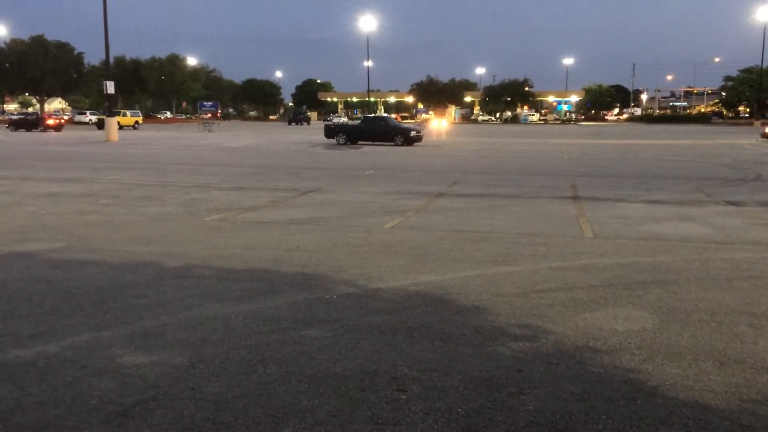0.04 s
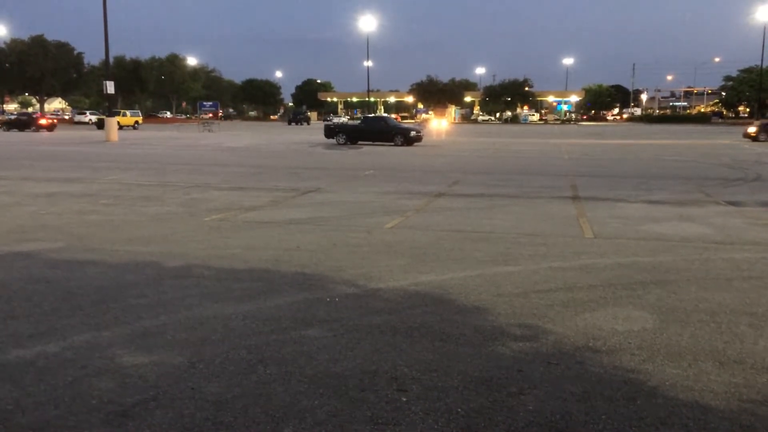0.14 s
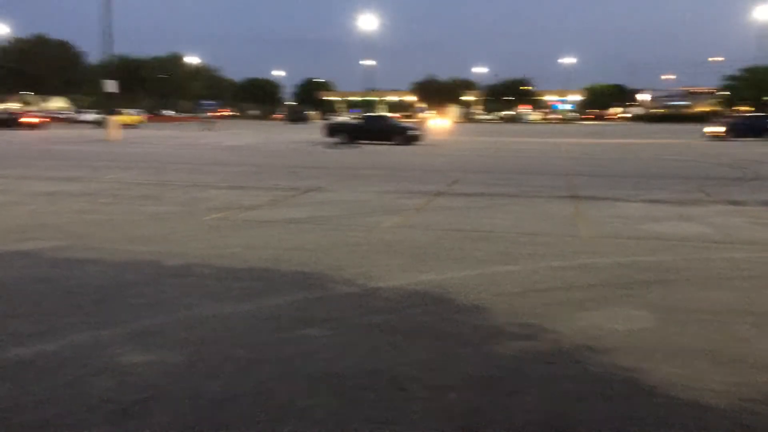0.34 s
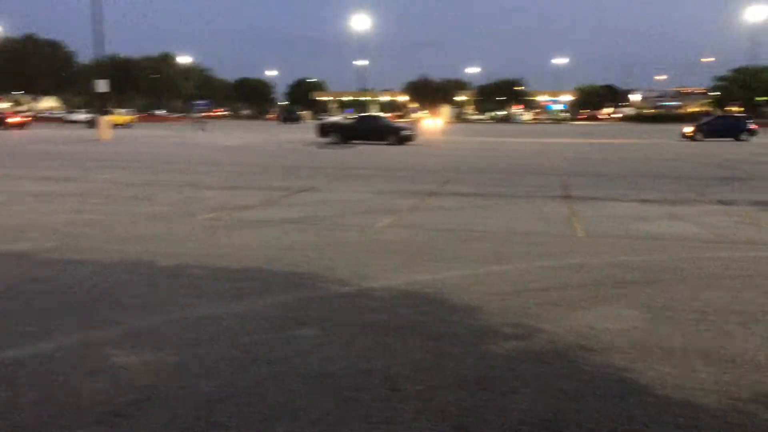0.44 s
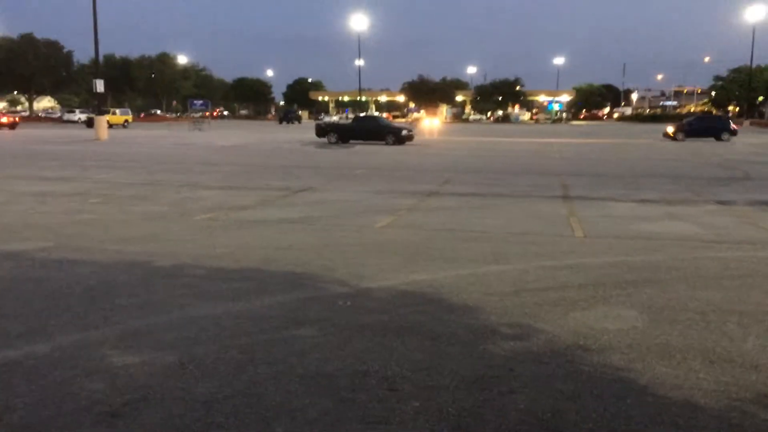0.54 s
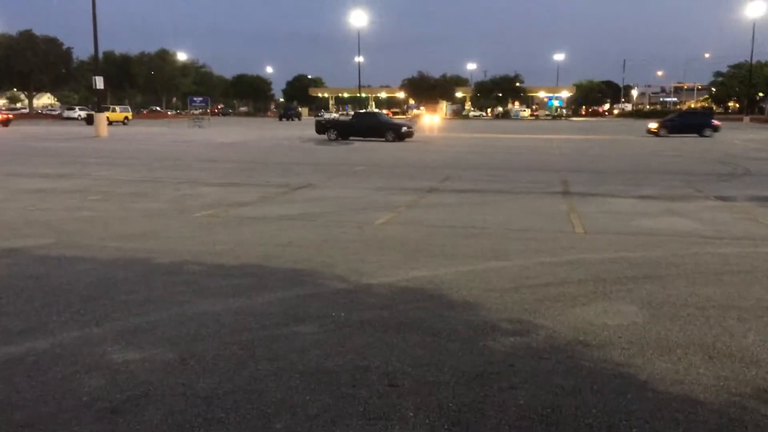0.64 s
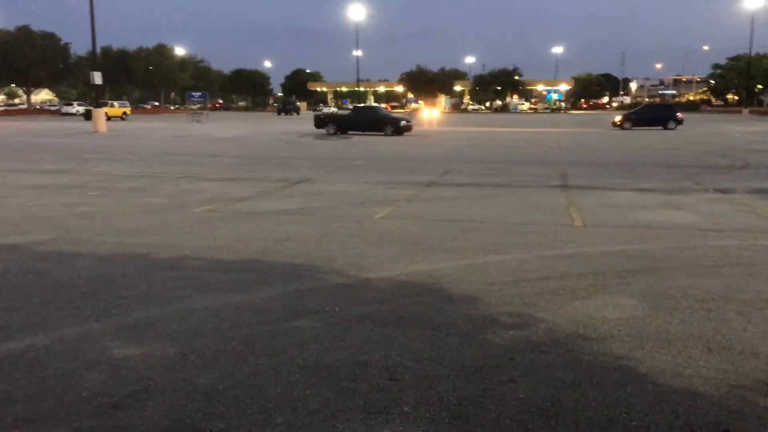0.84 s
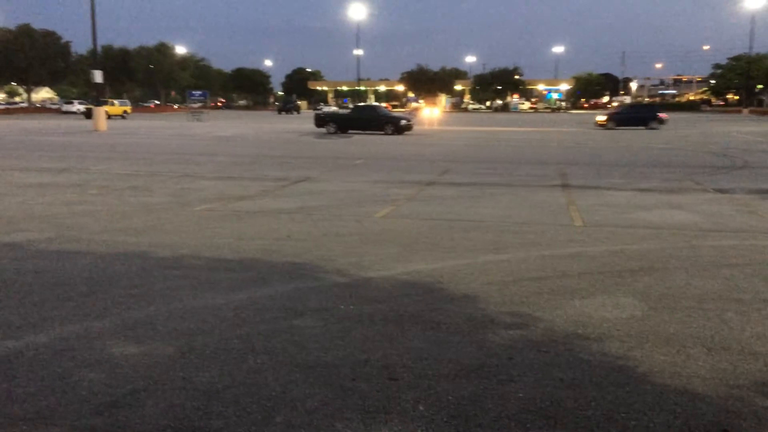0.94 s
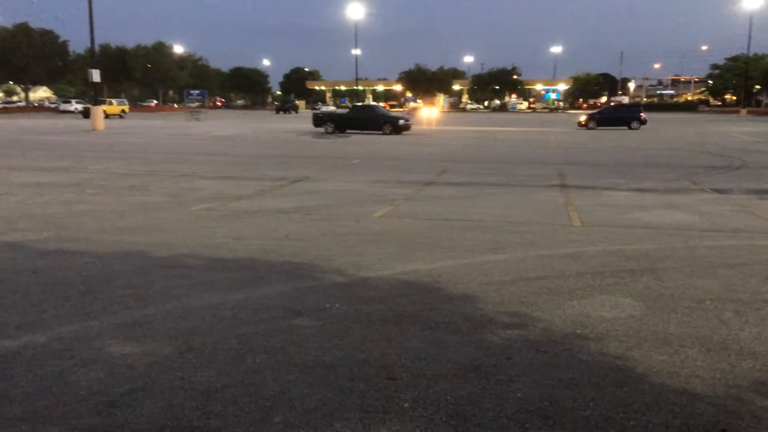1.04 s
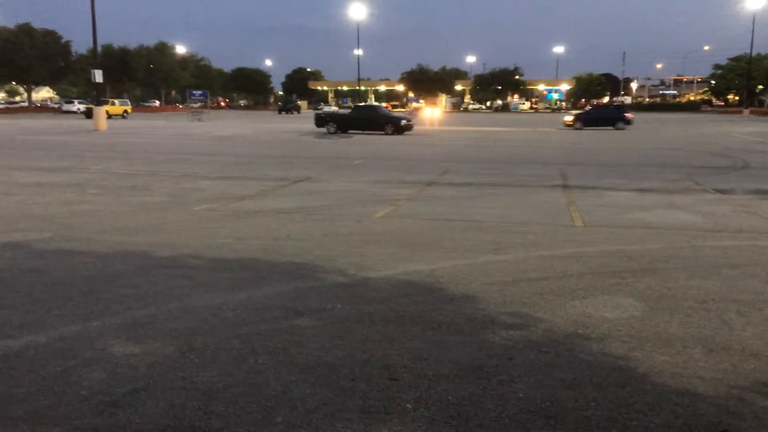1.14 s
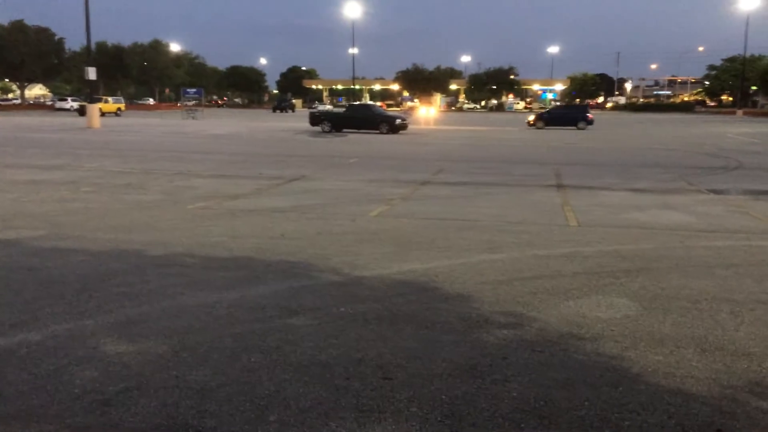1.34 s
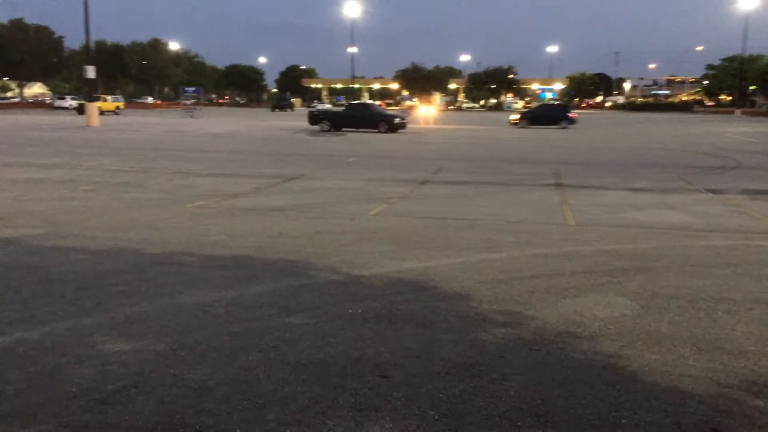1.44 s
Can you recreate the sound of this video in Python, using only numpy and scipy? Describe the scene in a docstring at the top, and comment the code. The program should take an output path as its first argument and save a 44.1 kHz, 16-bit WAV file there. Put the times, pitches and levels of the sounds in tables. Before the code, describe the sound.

Outdoors in a parking lot, over a faint hum of far traffic, a loud three-tone air horn blasts once. The brassy chord holds steady with a rush of air, then stops and briefly rings out.

```python
"""An open parking lot, across which a three-chime train horn gives one blast of about a second.
Each diaphragm buzzes into its bell with a harmonic series, and sum tones join the chord. The horns start
sharp and settle as air pressure builds, dull as the tank drains, and ring out when the valve shuts.
Air rushes through the bells; just before the end the chord falters with a dull puff and swells.
Cars and pavement scatter the sound, distant buildings send it back, and traffic hums behind it."""
import sys
import numpy as np
from scipy import signal
from scipy.fft import rfft, irfft
from scipy.io import wavfile

SR = 44100
rng = np.random.default_rng(int(sys.argv[2]) if len(sys.argv) > 2 else 0)


def dump_mix(stems):
    """Bounce the given channels to the path in sys.argv[1] as a 16-bit WAV at rate SR."""
    frames = np.atleast_2d(stems).T  # one column per channel
    limited = np.clip(frames, -1, 1)  # hard clip at full scale
    pcm = np.round(limited * 32767).astype(np.int16)
    wavfile.write(sys.argv[1], SR, pcm)


N = 66150
T = np.arange(N) / SR
OPEN_S, SHUT_S = 0.233, 1.1912  # the air valve
DULL_HZ, EDGE_HZ = 2520, 15350  # corner of the treble loss; upper band limit


def horns():
    """Three harmonic series intermodulate to give sum tones; returns the chord and each horn's phase."""
    # low, middle, high horn: pitch_hz, rise_s, ring_s, sharp_ratio, settle_s, lift_ratio, loss_db_per_s
    chimes = [(302.83, 0.026, 0.077, .095, .052, .015, 0), (489.84, 0.0092, 0.11, .035, 0.02125, 0.012, 4),
              (768.5, 0.01, .008, 0.003036, 0.021, .01, -1)]
    # one row per horn: level_db of harmonics 1, 2, ...
    partials = [
        [-20, -17, -20.5, -31, -36, -48, -36.5, -26.5, -36, -38.5, -34.5, -53],
        [-31.5, -25, -32.5, -34, -35.5, -36, -53.5],
        [-13, -33.5, -27, -29.5, -53, -72, -41, -34.5, -43],
    ]
    # the high horn's pitch plus harmonics 1, 2, ... of the low horn: level_db
    sum_tones = [-37.5, -37, -41, -48.5, -71, -32, -32, -35, -38.5, -46]
    phases, drives, gains = zip(*[diaphragm(*row) for row in chimes])
    low, mid, high = [(phase, row[0], drive) for phase, row, drive in zip(phases, chimes, drives)]
    age = np.maximum(T - OPEN_S, 0)
    # the low horn's overtones stay weak until it locks onto its bell
    locked = amp(-10 * np.exp(-(age / 0.041) ** 4))
    # the upper horns overshoot as they speak
    overshoot = amp(3.5 * np.exp(-((age - 0.028) / 0.015) ** 2))
    chord = gains[0] * harmonics(*low, partials[0], locked, upper_db=-1.5)
    chord += overshoot * gains[1] * harmonics(*mid, partials[1], upper_db=-1)
    chord += overshoot * gains[2] * harmonics(*high, partials[2], upper_db=-3)
    high_phase, high_hz, high_drive = high
    sums = harmonics(*low, sum_tones, locked, high_phase, high_hz, upper_db=4)
    sums += harmonics(*low, [], locked, 2 * high_phase, 2 * high_hz, upper_db=-1, first=9)
    return chord + high_drive * sums, phases


def diaphragm(pitch_hz, rise_s, ring_s, sharp, settle_s, lift, loss_db_per_s):
    """A pressure-driven oscillator starts sharp, settles and lifts as it dies: phase, drive, gain."""
    bend = sharp * np.exp(-(np.maximum(T - OPEN_S, 0) / settle_s) ** 2)
    bend += lift * (1 - np.exp(-np.maximum(T - SHUT_S, 0) / 0.036))
    bend += 0.003463 * (T - 0.65)  # the pitch creeps up as the tank drains
    bend -= 0.012 * falter()
    bend += 0.00048 * drift(18.7) + 0.0021 * drift(250)  # slow wander, fast jitter
    phase = 2 * np.pi * np.cumsum(pitch_hz * (1 + bend)) / SR
    return phase, valve(rise_s, ring_s), amp(-loss_db_per_s * (T - 1.54))


def harmonics(phase, pitch_hz, drive, levels, overtones=1, carrier=0, carrier_hz=0, upper_db=0, first=1):
    """Nonlinear steepening: higher partials need more pressure. A carrier phase makes them sum tones."""
    # brassy spectrum of the partials beyond the given levels: frequency_hz, level_db
    brass = [(3500, -59), (4400, -59.5), (5100, -55.5), (5700, -46.5), (6400, -55.5), (7500, -61),
             (9800, -58.5), (10600, -64), (13000, -63), (15000, -69)]
    steepening_hz, flutter_db = 2190, 0.88
    flutters = [flutter_db * drift(25) for _ in range(7)]
    tone = np.zeros(N)
    for k in range(first, int((EDGE_HZ - carrier_hz) / pitch_hz)):
        hz = carrier_hz + k * pitch_hz
        db = levels[k - 1] if k <= len(levels) else level_at(brass, hz) + upper_db
        gain = amp(db + shading(hz) + flutters[k % len(flutters)])
        swing = drive ** (min(k, 2.5) + hz / steepening_hz) * (overtones if k > 1 else 1)
        tone += gain * swing * np.cos(k * phase + carrier + k * k)
    return tone


def valve(rise_s, fall_s):
    """Pressure builds when the valve opens and decays exponentially when it shuts."""
    rise = 1 - np.exp(-(np.maximum(T - OPEN_S, 0) / rise_s) ** 2)
    return rise * np.exp(-np.maximum(T - SHUT_S, 0) / fall_s)


def shading(hz):
    """Spectral tilt in dB: the treble fades as the tank drains; the middle swells near the end."""
    dull_db_per_s, drain_start_s, swell_s = 8.5, 0.48, 1.135
    dull_db = dull_db_per_s * min(hz / DULL_HZ, 1) * np.maximum(T - drain_start_s, 0)
    swell_db = 2 * np.exp(-((hz - 650) / 300) ** 2)
    return swell_db * np.clip((T - swell_s) / 0.013 + 0.5, 0, 1) - dull_db


def falter(at_s=1.133, width_s=0.011):
    """A Gaussian pulse marks the instant at which the pitch dips."""
    return np.exp(-((T - at_s) / width_s) ** 2)


def air(phases):
    """Flow noise in the bells is amplitude-modulated as the diaphragms chop the air."""
    # rush of air: frequency_hz, density_db_per_hz
    rush = [(60, -100), (200, -86), (450, -71.5), (620, -58.5), (950, -65), (1150, -69), (1500, -63.5),
            (1900, -64), (2450, -64.5), (3200, -64), (3700, -76), (4400, -82), (5100, -78.5), (5700, -70),
            (6400, -67), (7500, -72.5), (9800, -73.5), (10600, -84.5), (13000, -90), (15200, -90)]
    chop = unit(1 + 0.23 * sum(np.cos(phase) for phase in phases))
    return noise(rush) * chop * valve(rise_s=0.017, fall_s=0.026) * amp(shading(DULL_HZ))


def puff():
    """A short burst of band-limited noise is heard as a dull puff when the chord falters."""
    # the puff: frequency_hz, density_db_per_hz
    spectrum = [(60, -95), (200, -74), (330, -64), (650, -55), (1000, -63), (1600, -70), (4000, -100)]
    return noise(spectrum) * falter()


def scatter(x):
    """Diffuse reflections from cars, poles and pavement form an exponentially decaying tail."""
    # reverberation time of the lot: frequency_hz, t60_s
    decay = [(300, 0.97), (1000, 0.83), (3000, 0.36), (8000, 0.72), (15000, 0.32)]
    # strength of the reflections: frequency_hz, gain_db
    response = [(300, -25), (800, -19), (1500, -14), (2800, -15), (4200, -12), (6000, -18), (15000, -16)]
    reflections_per_s = 2000
    taps = rng.standard_normal(N) * (rng.random(N) < reflections_per_s / SR) * (T > 0.01)
    hz, t, bands = signal.stft(taps, SR, nperseg=256)
    bands = bands * amp(-60 * t / level_at(decay, hz)[:, None])
    tail = signal.istft(bands, SR, nperseg=256)[1]
    return colour(signal.fftconvolve(x, tail / np.linalg.norm(tail))[:N], response)


def echoes(x):
    """Specular reflection: distant buildings return the chord, delayed by its travel time."""
    # echo paths: delay_s, gain_db
    paths = [(.05, -31), (.135, -51), (.33, -24.5), (1.24, -32)]
    # filter common to all paths: frequency_hz, gain_db
    response = [(300, 6.5), (500, 6.5), (600, 1), (770, 7.5), (950, 3), (1500, 12), (2500, 0), (3500, 7.5),
                (4500, 19), (6000, -4), (10000, -7), (15000, -34)]
    delayed = sum(amp(db) * np.interp(T - delay_s, T, x, left=0) for delay_s, db in paths)
    return colour(delayed, response)


def traffic():
    """Far traffic blends into broadband noise; an engine's uneven firing modulates a low noise band."""
    # distant traffic: frequency_hz, density_db_per_hz
    wash = [(20, -100), (50, -80), (85, -78.5), (135, -68), (220, -75), (500, -78), (950, -75),
            (1500, -79.5), (3000, -93), (6000, -99), (10000, -106), (15000, -120)]
    # envelope of the engine's burble: time_s, level_db
    envelope = [(0, -38.5), (.07, -40.5), (.2, -39.5), (.3, -58), (1.5, -77)]
    burble_hz, width_hz, firings_per_s = 122, 67, 27
    band = np.exp(-(np.abs(np.fft.rfftfreq(N, 1 / SR) - burble_hz) / width_hz) ** 3 / 2)
    firing_hz = firings_per_s * (1 + 0.196 * drift(10))
    throb = 1 + 0.64 * np.cos(2 * np.pi * np.cumsum(firing_hz) / SR)
    burble = unit(irfft(rfft(rng.standard_normal(N) * throb) * band, N))
    return noise(wash) + burble * amp(np.interp(T, *np.transpose(envelope)))


def amp(db):
    """Converts decibels to an amplitude ratio."""
    return 10 ** (np.asarray(db) / 20)


def unit(x):
    """Normalises to rms 1."""
    return x / np.sqrt(np.mean(x ** 2) + 1e-20)


def level_at(points, hz):
    """Interpolates a curve on a log-frequency axis."""
    f, value = np.transpose(points)
    return np.interp(np.log(hz + 1), np.log(f + 1), value)


def colour(x, points):
    """Zero-phase filtering by a response in dB."""
    gain = amp(level_at(points, np.fft.rfftfreq(2 * N, 1 / SR)))
    return irfft(rfft(x, 2 * N) * gain)[:N]


def noise(points):
    """Gaussian noise with a spectral density in dB per Hz."""
    return colour(rng.standard_normal(N), points) * np.sqrt(SR / 2)


def drift(rate_hz):
    """Low-passed noise: a smooth random fluctuation of rms 1."""
    lowpass = np.exp(-(np.fft.rfftfreq(N, 1 / SR) / rate_hz) ** 2)
    return unit(irfft(rfft(rng.standard_normal(N)) * lowpass, N))


def scene():
    """Superposition of the blast, its reflections, the puff and the traffic, in mono."""
    chord, phases = horns()
    blast = chord + air(phases)
    return (blast + scatter(blast) + echoes(chord) + puff() + traffic())[None]


def record(dry):
    """A linear-phase low-pass filter limits the bandwidth."""
    lowpass = signal.firwin(1023, EDGE_HZ, window=("kaiser", 9), fs=SR)
    return signal.oaconvolve(dry, lowpass[None], "same")


dry = scene()
out = record(dry)
dump_mix(out)
```